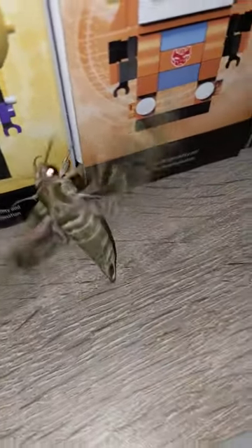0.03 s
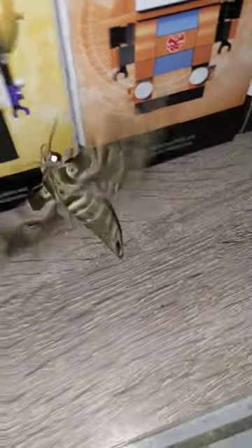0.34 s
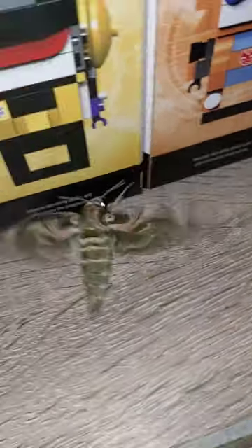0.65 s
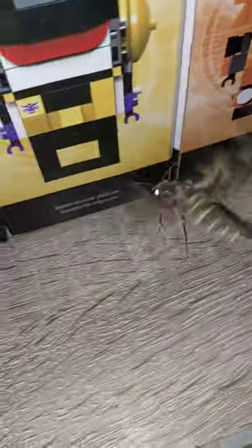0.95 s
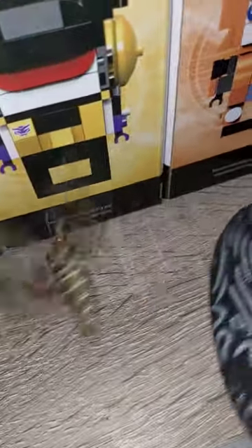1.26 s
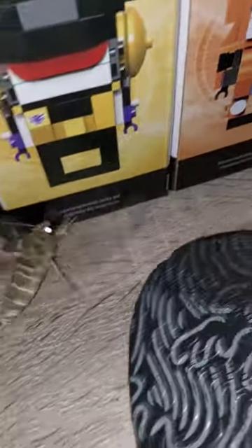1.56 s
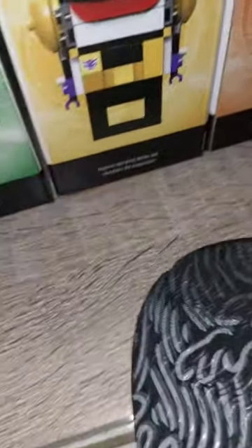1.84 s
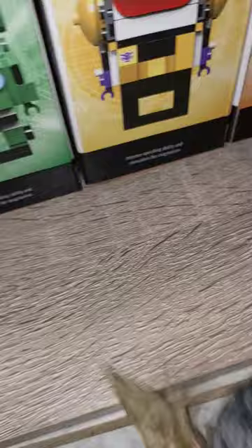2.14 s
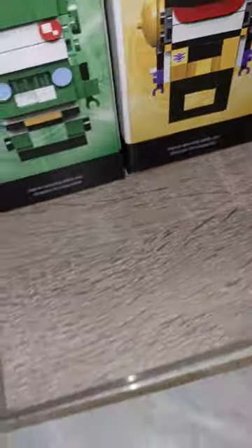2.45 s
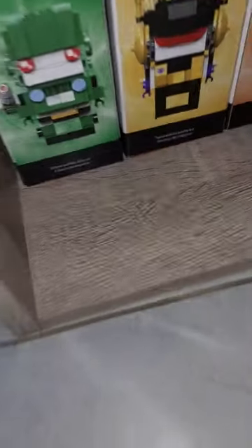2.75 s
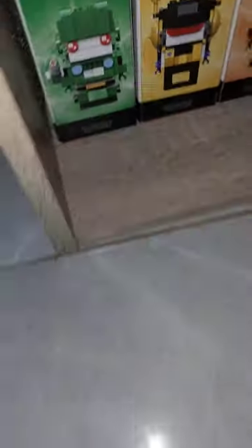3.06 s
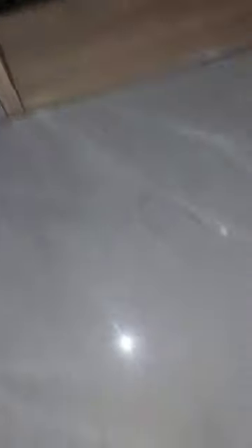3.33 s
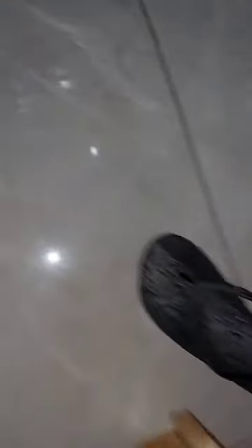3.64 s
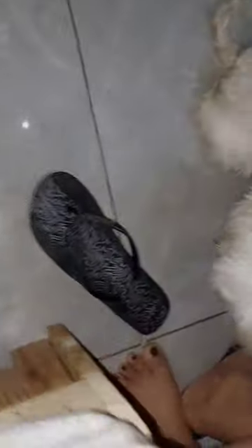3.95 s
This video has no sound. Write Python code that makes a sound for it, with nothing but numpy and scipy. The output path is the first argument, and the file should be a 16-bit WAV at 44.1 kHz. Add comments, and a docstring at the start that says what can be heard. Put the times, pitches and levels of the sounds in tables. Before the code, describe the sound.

A big moth's papery wings flutter against cardboard boxes, then a sharp knock sounds indoors.

```python
"""Papery wing beats, faint at first: a big moth on a wooden shelf, left of a stereo microphone pair.
Its wings slap and brush cardboard boxes, which answer with hollow thumps. It takes off, drones
close past the microphones as its strokes push the air, and scrabbles again further right.
Near the end a sharp knock and a softer one ring through the tiled room.
Behind it all lie a soft rumble and a mains hum that fades towards the end."""
import sys
import numpy as np
from scipy import signal
from scipy.fft import rfft, irfft
from scipy.io import wavfile

SR = 44100
rng = np.random.default_rng(int(sys.argv[2]) if len(sys.argv) > 2 else 0)


def bounce(signal):
    """Save signal as a 16-bit WAV file at the path given by the first command-line argument."""
    frames = np.transpose(np.atleast_2d(signal))
    limited = np.clip(frames, -1, 1)
    pcm = np.round(limited * 32767).astype(np.int16)
    wavfile.write(sys.argv[1], SR, pcm)


N = 176400

# Levels are relative within a layer. pan_db is left minus right; thump_db shifts the thump alone.
# Runs of wing beats on the boxes:
# first_s, last_s, beats, first_db, last_db, thump_db, favoured_hz, decay_ms
BEAT_RUNS = [(0.024, 0.586, 19, -18.5, -15.5, -0.5, 484, 2.62), (0.6138, 0.641, 2, 0, 3.5, -5, 400, 1.45),
             (0.692, .721, 2, 3.5, 0.5, -9, 400, 1.66), (0.749, 0.818, 3, -1.5, -7, -1, 350, 2.74),
             (0.85, 0.942, 4, 1, 0.5, -5, 380, 1.66), (0.993, 1.019, 2, 0, 0.5, 1, 396, 1.5),
             (1.134, 1.231, 4, -4.5, 1.5, -2, 405, 1.18), (1.322, 1.352, 2, 5, 1, -1, 435, 1.36),
             (1.38, 1.438, 3, 8, 3, -9, 960, 1.55), (1.55, 1.58, 2, -6, -9.5, 6.5, 800, 1.8),
             (1.616, 1.676, 3, 2.5, 4, -8, 820, 1.24), (1.706, 1.761, 3, 1.5, 4.5, 3.5, 650, 1.5),
             (1.793, 1.819, 2, -1, -11, -2.5, 706, 1.9), (1.874, 1.926, 3, -8.5, -2.5, -21, 600, 2.4),
             (2.137, 2.24, 4, -8, -9.5, -5, 583, 1.72), (2.353, 2.383, 2, -8, -12.5, -3, 600, 2.2),
             (2.588, 2.605, 2, 6.5, 1, -3, 334, 1.56)]
# Single strikes and body bumps: start_s, level_db, thump_db, favoured_hz, decay_ms
SINGLE_STRIKES = [(0.412, -18.5, 8, 1300, 1.7), (1.044, -13.5, 11, 374, 1.6), (1.106, -4, 4.5, 312, 2),
                  (1.264, 1, 8.5, 427, 2), (1.290, -1.5, 9, 483, 2.3), (1.465, 1.5, -1, 446, 2.9),
                  (1.844, 8, -6.5, 800, 1.75), (2.019, 0, -30, 2400, 1), (2.053, -1, 2.5, 2500, 1.7),
                  (2.296, -4.5, 4, 620, 3.1), (2.322, 3.5, -12, 603, 2.35), (2.572, -7.5, -6, 600, 1.9),
                  (2.626, 14.5, -17, 300, 2.56), (2.757, -1, -15, 600, 1.6), (2.831, -6.5, -30, 1220, 5),
                  (2.856, 5.5, -12, 1200, 2.76), (2.884, -0.5, -22, 1200, 3.9), (2.930, -8, -9, 1180, 12),
                  (2.976, -11.5, -26, 1200, 12.6), (3.019, -14.5, -20, 1220, 21),
                  (3.285, -7.5, -7, 350, 1.02), (3.315, -6.5, -19, 350, 1.8), (3.339, -4, -10, 590, 1.7),
                  (3.372, -8, -12, 587, 8.4), (3.475, -15, -11, 600, 6.3), (3.515, -21, 18, 350, 23),
                  (3.543, -12.5, -1, 350, 4.1)]
# Wings dragging along a surface: start_s, length_s, level_db, box_rumble_db
WING_RUBS = [(0.986, 0.12, -14, -2), (1.443, 0.16, -11, -3), (1.915, 0.21, -13, -16),
             (2.583, 0.075, -6.5, -6.5), (2.729, 0.14, -17.5, -18), (3.291, 0.095, -14, -14),
             (3.394, 0.045, -6.5, -14)]
# Where the wings touch, moving from left to just right of centre: time_s, pan_db
MOTH_PAN = [(0.4, 5.5), (0.62, 12), (1.2, 14.5), (1.28, 6.5), (1.65, 8.5), (2.05, 8), (2.3, 2), (2.6, -1.5),
            (3.4, -3.5)]
# Papery crackle of a slap: frequency_hz, level_db
SLAP_SPECTRUM = [(200, 7.5), (900, -8), (1900, -3), (2400, 1.5), (3400, -1), (4600, 3.5), (6400, 5),
                 (8800, -2), (12500, 4), (15500, -1.5), (18000, -7)]
# Rustle of a dragging wing: frequency_hz, level_db
RUB_SPECTRUM = [(300, -36), (1500, -3.5), (2400, 2), (3500, -3.5), (6000, 2), (9000, -5), (12500, 0.5),
                (16000, -11.5)]
# Modes of a cardboard box: pitch_hz, level_db, t60_s
BOX_MODES = [(269, 5.5, 0.021), (342.5, 2.5, 0.041), (416, 0.5, 0.027), (638, 0, 0.039), (688, 0.5, 0.02),
             (961, -3.5, 0.031), (1300, 1, 0.014), (1705, 6, 0.0069), (2430, 7, 0.0095)]
# Pace of the wing strokes: time_s, rate_hz
STROKE_RATE = [(0, 33.5), (.58, 31.5), (.68, 35.5), (1.0, 30.5), (1.8, 36.5), (2.2, 34), (2.48, 34.5),
               (2.72, 29.5)]
# Harmonics of the drone, from the stroke rate upward: level_db
DRONE_HARMONICS = [-12.5, -0.5, -17, -15.5, -17]
# Air rushing off the wings: frequency_hz, level_db
WHOOSH_SPECTRUM = [(20, -55), (40, 3.5), (150, 11), (300, -7), (450, -17), (900, -43), (4000, -79)]
# Pushed air, loudest as the moth passes the microphones: time_s, level_db
AIR_LEVEL = [(0, -43), (.9, -53.5), (1.4, -67), (1.85, -55.5), (2.14, -71.5), (2.39, -38), (2.46, -30.5),
             (2.54, -29), (2.63, -51), (2.71, -34), (2.82, -47), (3.1, -56.5), (4, -54.5)]
# Side on which that air arrives: time_s, pan_db
FLIGHT_PAN = [(0, 13.5), (2.2, 49), (2.45, -19.5), (4, -2.5)]
# Blows heard through the room: start_s, level_db, lowpass_hz, ring_db, favoured_hz
KNOCK_BLOWS = [(3.597, 4, 10300, 0, 684), (3.612, -10, 4000, 0, 1010), (3.797, -10, 1780, 2, 1280)]
# Impact of a knock: frequency_hz, level_db
KNOCK_SPECTRUM = [(60, -5), (190, -0.5), (400, -1), (750, 3.5), (1300, -6), (2200, -4.5), (4700, -7),
                  (7000, -7.5), (9000, -15.5), (12000, -8), (16000, -17)]
# Hollow ring of a knock: pitch_hz, level_db, t60_s
KNOCK_RING_MODES = [(573, 2, 0.19), (756, -5, 0.081), (905, -10, 0.24), (1046, -8, 0.24), (1136, 2.5, 0.07),
                    (1224, 7, 0.082)]
# Mains hum and its octave: pitch_hz, level_db
HUM_PARTIALS = [(120.4, -34), (240.8, -51.5)]
# Fade of the hum: time_s, level_db
HUM_FADE = [(0, -0.96), (2.8, -1.5), (3.4, -4), (3.65, -5.5), (4, -10.5)]
# Background rumble of the room: frequency_hz, level_db
RUMBLE_SPECTRUM = [(20, -7), (70, 4), (200, -3), (400, -14.5), (900, -20.5), (1300, -27), (1720, -19),
                   (2200, -30.5), (5000, -30.5), (13000, -37.5), (17000, -47)]
# Tonal mismatch of the two microphones: frequency_hz, pan_db
MIC_MISMATCH = [(150, 0), (1200, -1.5), (2500, 3), (5000, 0), (9000, -3), (14000, -7)]

SLAP_DB, THUMP_DB, RUB_DB, WHOOSH_DB = -26.5, -37.5, -35, -15
KNOCK_DB, KNOCK_RING_DB, RUMBLE_DB = 1.5, -37, -51.5
SLAP_RISE_S, THUMP_DECAY_S, CRACK_DECAY_S, ROOM_T60_S = 0.00062, 0.0011, 0.0033, 0.37
HIND_MAX_SHARE, HIND_MAX_LAG_S, SLIDE_MAX_DB = 0.37, 0.0077, -35
SIDES = np.array([[1], [-1]])  # left, right


def wing_slaps(tilt_spread_db=5.5):
    """Each touch is a papery crackle, a hind-wing flick, a faint slide and a push on the cardboard."""
    slaps, thumps = np.zeros((2, N)), np.zeros((2, N))
    t = np.arange(SR // 25) / SR
    for start, db, thump_db, favoured_hz, decay_ms in wing_contacts():
        touch = (1 - np.exp(-t / SLAP_RISE_S)) * np.exp(-t * 1000 / decay_ms)
        hind = HIND_MAX_SHARE * rng.random() * np.interp(t - HIND_MAX_LAG_S * rng.random(), t, touch)
        slide = undb(SLIDE_MAX_DB) * rng.random() * np.hanning(len(t))
        crackle = np.sqrt(touch ** 2 + hind ** 2 + slide ** 2) * grit(len(t))
        stretch = np.exp(0.11 * rng.uniform(-0.73, 1))  # each spot has its own papery pitch
        crackle = colour(crackle, [(hz * stretch, level) for hz, level in SLAP_SPECTRUM])[0]
        low = signal.sosfiltfilt(signal.butter(1, 6000, fs=SR, output="sos"), crackle)
        tilt = undb(tilt_spread_db * rng.standard_normal() / 2)  # and its own brightness
        slap = low / tilt + (crackle - low) * tilt
        place(slaps, undb(db + SLAP_DB) * slap, start, moth_pan(start))
        push = 12 * (t == 0) + .5 * np.exp(-t / THUMP_DECAY_S) * rng.standard_normal(len(t))
        thump = undb(db + thump_db + THUMP_DB) * cardboard_box(push, favoured_hz)
        place(thumps, thump, start, moth_pan(start) / 2)
    return slaps + thumps


def wing_contacts():
    """Every touch of a wing: even beats within each run, then the single strikes."""
    for start, end, beats, first_db, last_db, thump_db, favoured_hz, decay_ms in BEAT_RUNS:
        for time, db in np.linspace((start, first_db), (end, last_db), int(round(beats))):
            yield time, db, thump_db, favoured_hz, decay_ms
    yield from SINGLE_STRIKES


def wing_rubs(throb_db=3, throb_hz=35, box_hz=400, catch_db=4):
    """Scaly wings drag along a surface, snagging in crisp catches and throbbing with the stroke."""
    rustle, box_rumble = np.zeros((2, N)), np.zeros((2, N))
    t = np.arange(SR // 4) / SR
    throb = throb_db * np.cos(2 * np.pi * throb_hz * t)
    for start, length, db, box_db in WING_RUBS:
        envelope = np.clip(np.minimum(t / 0.014, (length - t) / 0.039), 0, 1)
        snags = undb(catch_db * np.minimum(rng.exponential(size=len(t)), 4))
        catches = unit(np.repeat(snags, 60)[:len(t)])  # each holds for 60 samples
        drag = undb(RUB_DB + db + throb) * catches * envelope * grit(len(t))
        place(rustle, drag, start, moth_pan(start))
        place(box_rumble, undb(box_db) * cardboard_box(drag, box_hz), start, moth_pan(start) / 2)
    return colour(rustle, RUB_SPECTRUM) + box_rumble


def cardboard_box(push, favoured_hz, detune=0.04, spread_db=2):
    """The cardboard answers a push; every spot rings a little differently."""
    modes = [(hz * (1 + detune * rng.standard_normal()), db + spread_db * rng.standard_normal(), t60)
             for hz, db, t60 in BOX_MODES]
    response = ring(modes, favoured_hz)
    return signal.fftconvolve(push, response / np.linalg.norm(response))


def wing_air():
    """Wing strokes push the air: a low drone and a pulsing whoosh that pass close by, left to right."""
    phase = 2 * np.pi * np.cumsum(curve(STROKE_RATE)) / SR
    drone = unit(sum(undb(db) * np.sin((k + 1) * phase + rng.uniform(0, 2 * np.pi))
                     for k, db in enumerate(DRONE_HARMONICS)))
    pulse = 1 + 1.35 * np.cos(phase)
    whoosh = colour(stereo_noise(width=1.0), WHOOSH_SPECTRUM) * pulse * undb(WHOOSH_DB)
    return (drone + whoosh) * undb(curve(AIR_LEVEL) + curve(FLIGHT_PAN) * SIDES / 2)


def knocks(pan_db=1, crack_share=0.11):
    """Near centre, a hard crack with a hollow ring; softer blows are duller and favour higher modes."""
    blows, cracks = np.zeros((2, N)), np.zeros((2, N))
    t = np.arange(SR // 2) / SR
    impact = undb(KNOCK_DB) * colour(1. * (t == 0), KNOCK_SPECTRUM)[0, :len(t)]
    for start, db, lowpass_hz, ring_db, favoured_hz in KNOCK_BLOWS:
        dull = signal.butter(1, min(lowpass_hz, SR / 2 - 1), fs=SR)
        blow = impact + undb(KNOCK_RING_DB + ring_db) * ring(KNOCK_RING_MODES, favoured_hz)
        crack = undb(KNOCK_DB) * crack_share * rng.standard_normal(len(t)) * np.exp(-t / CRACK_DECAY_S)
        place(blows, undb(db) * signal.lfilter(*dull, blow), start, pan_db)
        place(cracks, undb(db) * signal.lfilter(*dull, crack), start, pan_db)
    return tiled_room(blows, near_db=-0.5, near_t60=0.12, room_db=-7.5) + colour(cracks, KNOCK_SPECTRUM)


def tiled_room(x, near_db, near_t60, room_db):
    """Direct sound, quick reflections from nearby surfaces, then the tail of the room."""
    t = np.arange(SR) / SR
    onset = np.clip(t / 0.00082 - .5, 0, 1)

    def tail(t60):
        noise = rng.standard_normal((2, SR))
        low = signal.sosfiltfilt(signal.butter(2, 444, fs=SR, output="sos"), noise)
        diffuse = low[0] + noise - low  # the lows reach both microphones alike
        response = diffuse * np.exp(-np.log(1000) * t / t60) * onset
        return response / np.linalg.norm(response[0])
    near = convolve(x, undb(near_db) * tail(near_t60))
    far = convolve(x.sum(0) / np.sqrt(2), undb(room_db) * tail(ROOM_T60_S))
    return x + near + far


def room_tone():
    """Mains hum that fades as the microphone turns away, over a soft rumble."""
    t = np.arange(N) / SR
    hum = sum(np.sqrt(2) * undb(db) * np.sin(2 * np.pi * (hz * t + rng.random()))
              for hz, db in HUM_PARTIALS)
    rumble = undb(RUMBLE_DB) * colour(stereo_noise(width=0.89), RUMBLE_SPECTRUM)
    return hum * undb(curve(HUM_FADE)) + rumble


def moth_pan(time):
    """Left minus right, in dB, of the spot where the wings touch."""
    return np.interp(time, *np.array(MOTH_PAN).T)


def place(out, sound, start, pan_db, lag_s_per_db=.00003):
    """Add a sound, louder and earlier at the nearer microphone."""
    for channel, side in enumerate((1, -1)):
        i = max(0, int((start - side * pan_db * lag_s_per_db / 2) * SR))
        part = sound[:max(0, N - i)]
        out[channel, i:i + len(part)] += part * undb(side * pan_db / 2)


def ring(modes, favoured_hz, falloff_db_per_octave=5):
    """Damped modes of alternating sign; those near the favoured pitch answer most."""
    t = np.arange(SR // 2) / SR
    response = np.zeros(len(t))
    for k, (hz, db, t60) in enumerate(modes):
        gain = (-1) ** k * undb(db - falloff_db_per_octave * abs(np.log2(hz / favoured_hz)))
        response += gain * np.exp(-np.log(1000) * t / t60) * np.sin(2 * np.pi * hz * t)
    return response


def grit(count, unevenness=0.88):
    """Dense ticks of uneven size."""
    return unit(rng.standard_normal(count) * np.exp(unevenness * rng.standard_normal(count)))


def stereo_noise(width):
    """Noise shared by both channels, with an opposed part."""
    return rng.standard_normal(N) + width * rng.standard_normal(N) * SIDES


def colour(x, points, size=4096):
    """Minimum-phase filter of unit energy through (Hz, dB) points."""
    cepstrum = irfft(np.log(undb(spectrum_db(points, size))))
    cepstrum[1:size // 2] *= 2
    cepstrum[size // 2 + 1:] = 0
    response = irfft(np.exp(rfft(cepstrum)))
    return convolve(x, response / np.linalg.norm(response))


def spectrum_db(points, size):
    """Join (Hz, dB) points over log frequency, one value per FFT bin."""
    hz, db = np.array(points).T
    return np.interp(np.log(np.arange(size // 2 + 1) * SR / size + 1), np.log(hz), db)


def convolve(x, response):
    """Play each channel through a response."""
    return signal.fftconvolve(np.atleast_2d(x), np.atleast_2d(response), axes=1)[:, :N]


def curve(rows):
    """Straight lines through (s, value) points."""
    return np.interp(np.arange(N) / SR, *np.array(rows).T)


def unit(x):
    """Scale to rms 1."""
    return x / np.sqrt(np.mean(x ** 2))


def undb(db):
    """Decibels to gain."""
    return 10 ** (np.asarray(db) / 20)


def scene():
    """The moth on its shelf and in flight, the knocks, and the room behind them."""
    moth = tiled_room(wing_slaps() + wing_rubs(), near_db=-2.5, near_t60=0.02, room_db=-12.5)
    return moth + wing_air() + knocks() + room_tone()


def record(dry):
    """The two microphones differ in brightness; the recorder rounds the peaks and cuts the top."""
    mismatch = undb(spectrum_db(MIC_MISMATCH, 2 * N) * SIDES / 2)
    heard = irfft(rfft(dry, 2 * N) * mismatch)[:, :N]
    top_cut = signal.ellip(8, .2, 70, 16000, fs=SR, output="sos")
    return signal.sosfilt(top_cut, np.tanh(heard))


dry = scene()
out = record(dry)
bounce(out)
```